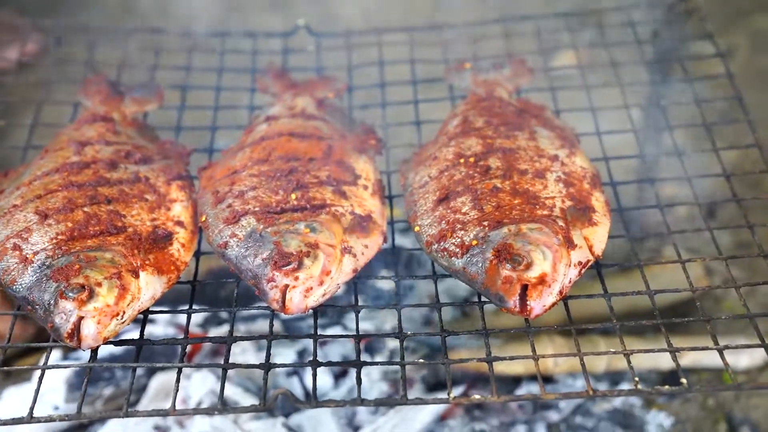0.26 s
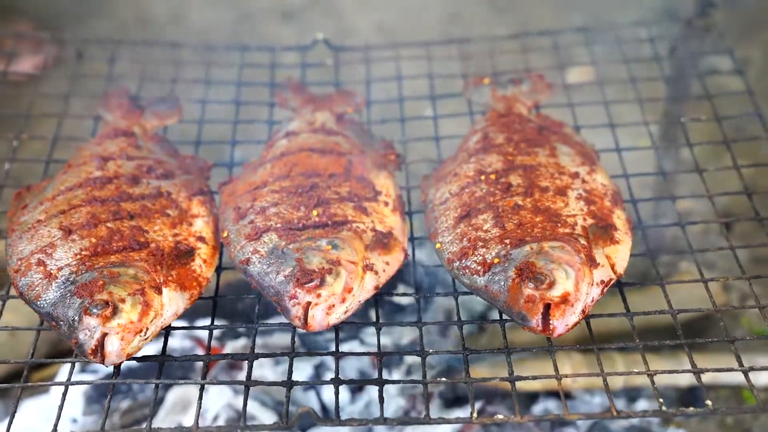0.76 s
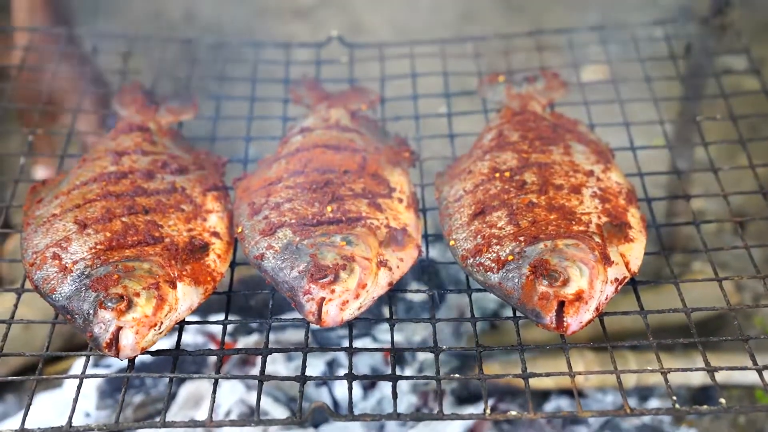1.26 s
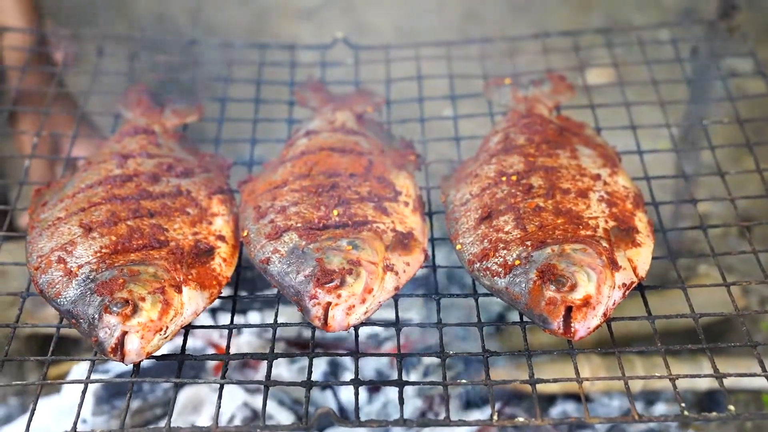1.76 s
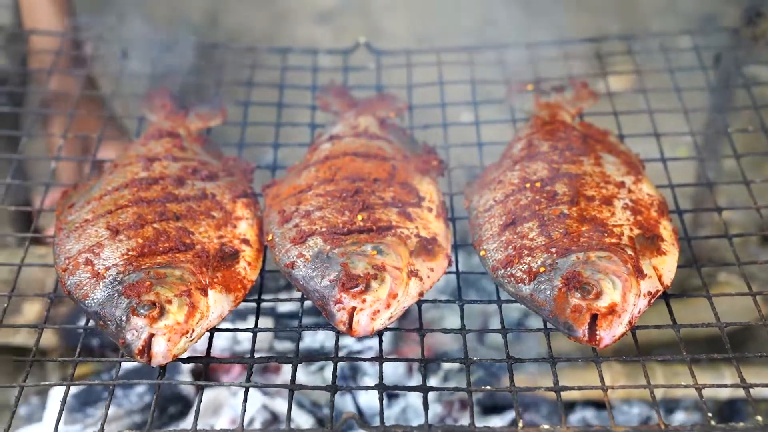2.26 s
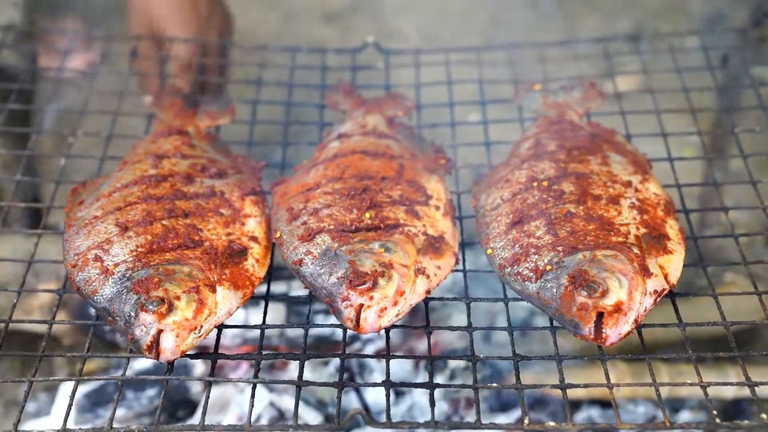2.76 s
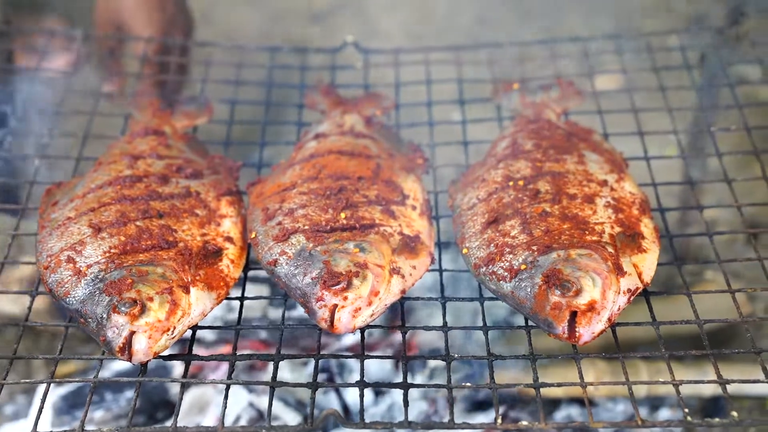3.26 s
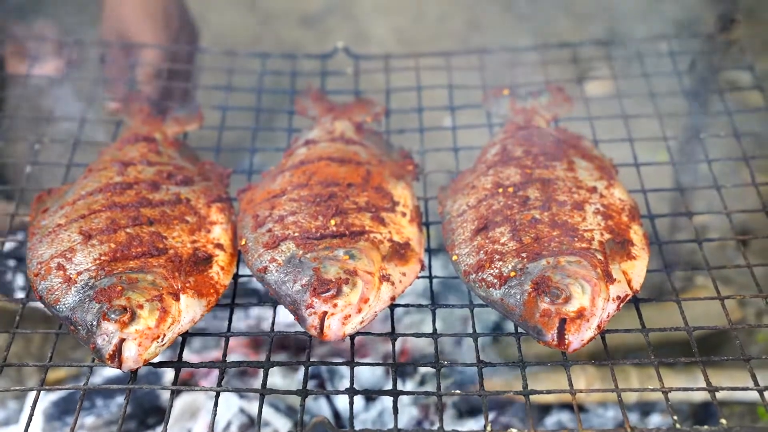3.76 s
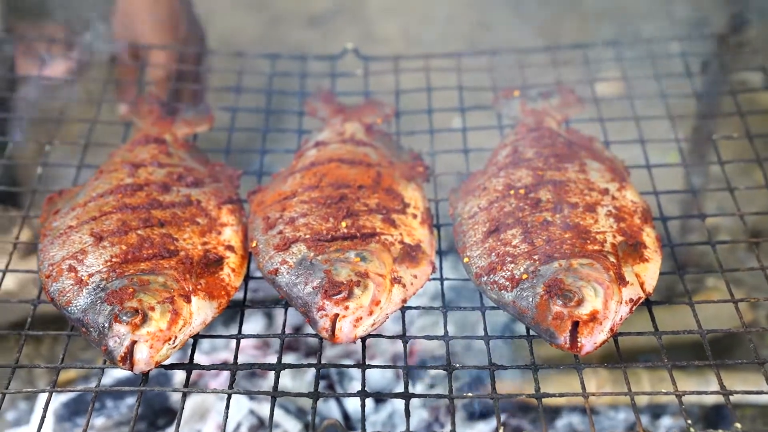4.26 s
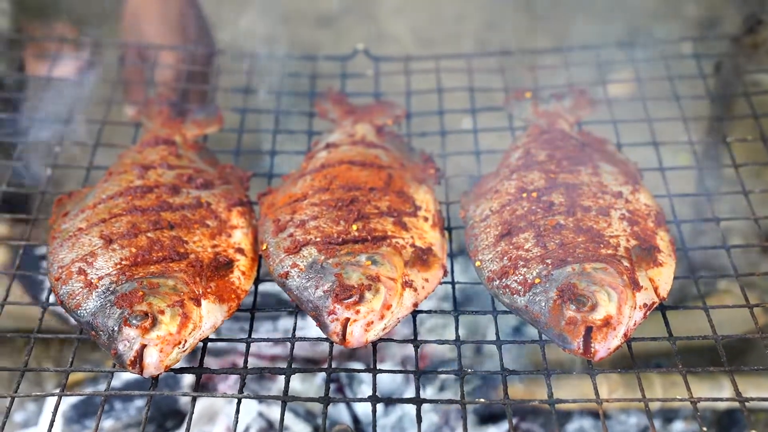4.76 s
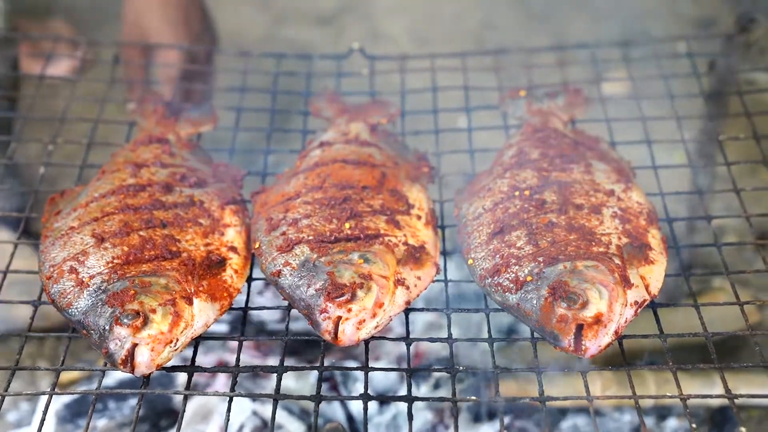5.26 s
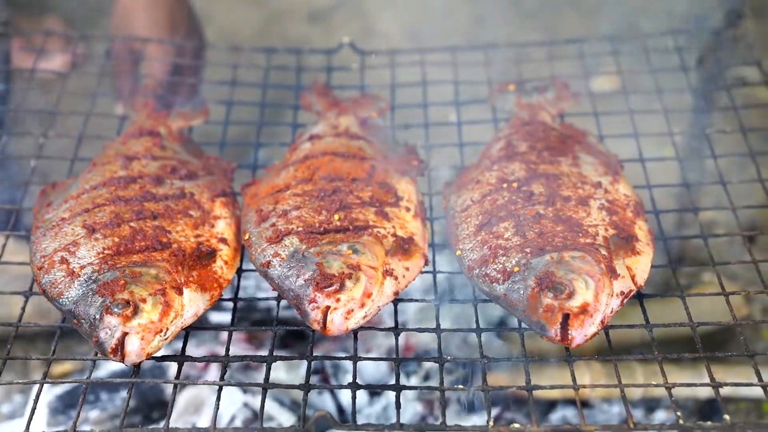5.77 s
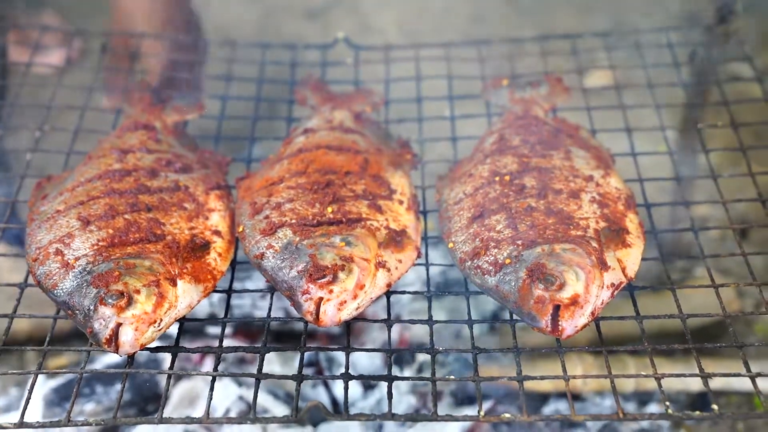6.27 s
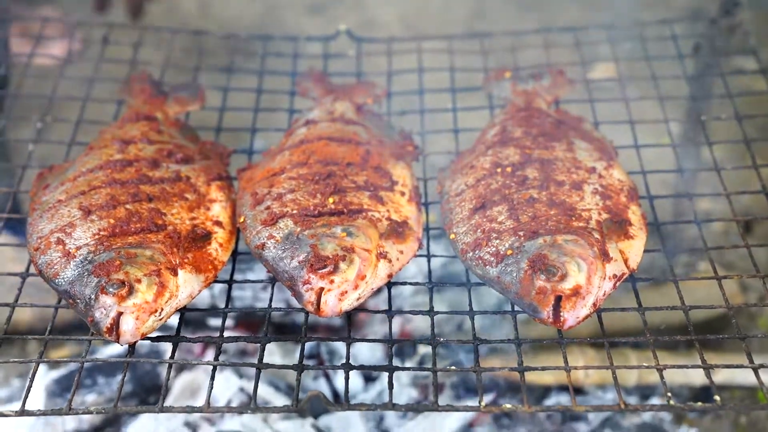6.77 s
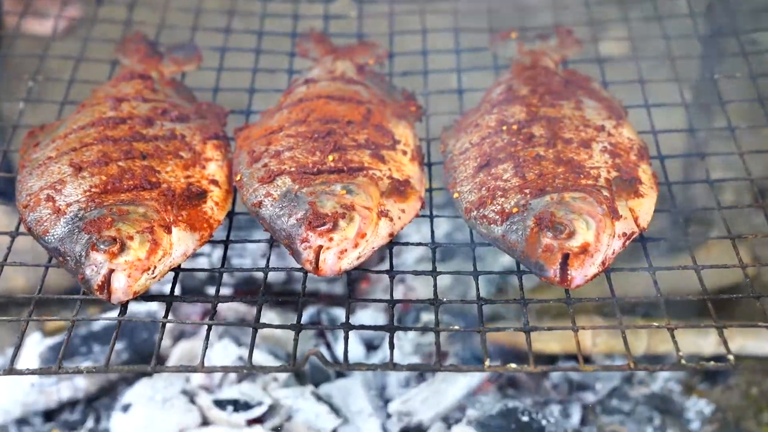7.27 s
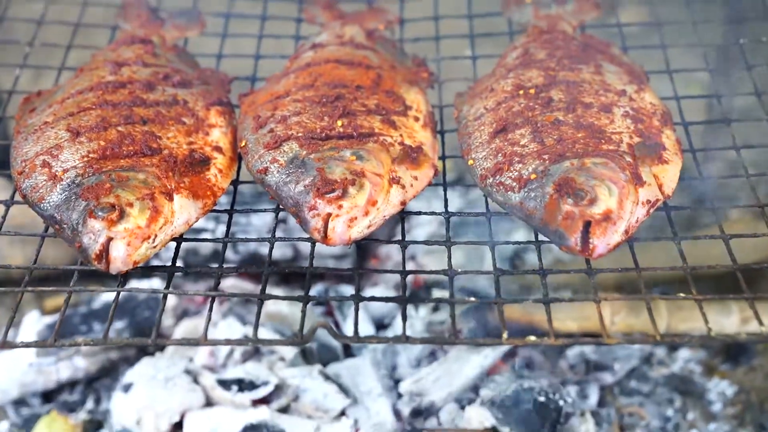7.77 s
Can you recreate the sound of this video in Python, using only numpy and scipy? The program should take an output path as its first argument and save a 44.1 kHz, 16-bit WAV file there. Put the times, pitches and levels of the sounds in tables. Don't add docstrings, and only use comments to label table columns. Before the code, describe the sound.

Sharp scattered pops from a charcoal fish grill, with gritty footsteps, a distant puttering engine, a few bird whistles and low gusty air.

```python
import sys
import numpy as np
from scipy import signal
from scipy.fft import rfft, irfft, next_fast_len
from scipy.io import wavfile
from scipy.ndimage import uniform_filter1d, map_coordinates

SR = 44100
rng = np.random.default_rng(int(sys.argv[2]) if len(sys.argv) > 2 else 0)


def boost_factor(decibels):
    exponent = np.asarray(decibels, float) / 20
    return 10 ** exponent


def materialize(psi):
    bounded = np.clip(np.atleast_2d(psi).T, -1, 1)
    quanta = np.round(bounded * 32767).astype(np.int16)
    wavfile.write(sys.argv[1], SR, quanta)


N = 353373

# f/Hz, level per Hz/dB
RUMBLE = [(25, -44), (50, 4), (80, -1), (115, -8.5), (190, -6.5), (260, -11), (400, -18.5), (700, -23.5),
          (1100, -30), (2000, -46.5), (4000, -69)]


def unit(x):
    return x / np.sqrt(np.mean(x ** 2) + 1e-20)


def curves(rows, edge=None):
    times, *columns = np.transpose(rows)
    return [np.interp(np.arange(N) / SR, times, column, edge, edge) for column in columns]


def wobble(rate):
    knots = rng.standard_normal(int(N * rate / SR) + 4)
    coarse = np.arange(0, N + 64, 64)
    smooth = map_coordinates(knots, [coarse * rate / SR])
    return np.interp(np.arange(N), coarse, smooth)


def coloured(x, spectrum):
    size = next_fast_len(N + 8192)
    hz, db = np.transpose(spectrum)
    log_hz = np.log(np.fft.rfftfreq(size, 1 / SR) + 1)
    gain = boost_factor(np.interp(log_hz, np.log(hz + 1), db, -120, -120))
    return unit(irfft(rfft(x, size) * gain, size)[:N])


def banded(x, centre_hz, octaves, top_hz=40000):
    hz = np.fft.rfftfreq(len(x), 1 / SR) + 1
    bell = np.exp(-.5 * (np.log2(hz / centre_hz) / max(octaves, .02)) ** 2)
    bass_cut = 1 + (220 / hz) ** 4
    treble_cut = 1 + (hz / top_hz) ** 3
    return irfft(rfft(x) * bell / bass_cut / treble_cut, len(x))


def band_width(octaves, narrowing, hz):
    return octaves * (hz / 1000) ** -narrowing


def add(track, s, burst):
    part = track[max(round(s * SR), 0):][:len(burst)]
    part += burst[:len(part)]


def air():
    # t/s, level/dB
    gust_points = [(0.0, -26.5), (0.56, -21), (0.6, -33), (1.27, -25.5), (1.42, -31.5), (2.94, -31),
                   (3.14, -20), (3.21, -32.5), (4.43, -29.5), (4.54, -22.5), (5.21, -37.5), (5.26, -24),
                   (5.48, -33), (6.91, -29.5), (7.35, -20), (7.51, -38), (7.75, -19), (8.0, -25.5)]
    # f/Hz, level per Hz/dB
    sway_colour = [(4, -31), (8, -9.5), (11.5, 5), (15, -6.5), (22, -18.5)]
    # f/Hz, level per Hz/dB
    buffet_colour = [(10, -11), (20, 2.5), (27, -4), (32, -12), (45, -17), (70, -25)]
    gust_db, = curves(gust_points)
    noise = rng.standard_normal((3, N))
    sway = boost_factor(gust_db - 0.4) * coloured(noise[0], sway_colour)
    buffet_db = -37 + .3 * (gust_db - gust_db.mean()) + 3 * wobble(4)
    buffeting = boost_factor(buffet_db) * coloured(noise[1], buffet_colour)
    rumble_db = -42.2 + .2 * wobble(3) + 0.72 * wobble(9)
    return sway + buffeting + boost_factor(rumble_db) * coloured(noise[2], RUMBLE)


def engine():
    # t/s, firings per second/Hz
    speed = [(0.0, 25.5), (2.94, 25.5), (4.17, 26.0), (6.73, 25.6), (8.0, 26.0)]
    # multiple of the firing rate, level/dB
    exhaust = [(3, -59), (5, -58), (6, -51.5), (7, -49), (8, -50.5), (9, -64.5), (10, -61.5), (11, -67),
               (12, -60), (23, -70.5), (26, -71), (27, -67)]
    # t/s, f/Hz, level/dB
    drone = [(0, 77.1, -55), (2.4, 79, -52.5), (3, 82, -59), (4.5, 83, -49.5), (5.3, 83, -55.5),
             (6, 71.8, -57), (8, 67.6, -55)]
    firing_hz = curves(speed)[0] * (1 + .002 * wobble(4))
    turn = 2 * np.pi * np.cumsum(firing_hz) / SR
    out = np.zeros(N)
    for multiple, db in exhaust:
        waver = boost_factor(1.6 * wobble(3)) * np.exp(.3j * wobble(4))
        out += boost_factor(db + 3.5) * np.imag(waver * np.exp(1j * round(multiple) * turn))
    drone_hz, drone_db = curves(drone)
    drone_level = boost_factor(drone_db + 6.5 + 3.3 * wobble(3.96))
    return out + drone_level * np.sin(2 * np.pi * np.cumsum(drone_hz) / SR)


def whistles(calls, flutter_db, waver, bend):
    rise, fall, edge_db = 0.18, .5, -10
    out, flutter, smear = np.zeros(N), wobble(110), wobble(250)
    for k, (s, length, start_hz, glide, db) in enumerate(calls):
        t = np.arange(round(length * SR)) / SR
        shape_db = np.interp(t / length, [0, rise, 1 - fall, 1], [edge_db, 0, 0, edge_db])
        age = np.clip(t / .12, .2, 1)
        own = slice(k * SR, k * SR + len(t))
        path_hz = start_hz + glide * length * (t / length) ** bend
        hz = path_hz * (1 + waver * age * smear[own])
        level_db = db + shape_db + 5.0 + flutter_db * age * flutter[own]
        add(out, s, boost_factor(level_db) * np.sin(2 * np.pi * np.cumsum(hz) / SR))
    return out


def bird():
    # t/s, length/s, start f/Hz, glide/(Hz/s), level/dB
    songs = [
        (.94, .25, 2870, 3300, -60),
        (3.24, .32, 3000, 1330, -60),
        (7.5, .16, 3330, 750, -66),
    ]
    # t/s, length/s, start f/Hz, glide/(Hz/s), level/dB
    fowl = [
        (6.47, .41, 850, 0, -64.5),
        (6.94, .09, 1590, -160, -64),
        (7.12, .22, 1510, -80, -67),
        (7.14, 0.47, 754, -49, -64),
        (7.76, .3, 1500, -60, -67),
    ]
    out = whistles(songs[:1], flutter_db=3.5, waver=.035, bend=1.7)
    out += whistles(songs[1:], flutter_db=2.5, waver=.014, bend=.85)
    return out + whistles(fowl, flutter_db=4, waver=.03, bend=1)


def gritty(size, grain_db, patch_db):
    jumps = np.repeat(rng.standard_normal(size // 40 + 1), 40)[:size]
    z = signal.stft(rng.standard_normal(size) * boost_factor(grain_db * jumps), nperseg=128)[2]
    patches = uniform_filter1d(rng.standard_normal(z.shape), size=3, axis=0)
    patches = uniform_filter1d(patches, size=8, axis=1)
    return unit(signal.istft(z * boost_factor(patch_db * unit(patches)), nperseg=128)[1][:size])


def feet():
    # peak t/s, level/dB, rise/s, fall/s
    drags = [
        (1.65, -46.5, .55, .55),
        (2.18, -44, 0.34, .5),
        (3.38, -51.5, .35, .13),
        (4.34, -53, .6, .35),
        (5.07, -50, 0.32, .3),
        (5.77, -48, .25, .4),
    ]
    # f/Hz, level per Hz/dB
    grit_colour = [(120, -16), (300, -4), (800, 2), (2000, 1), (4000, -0.5), (8000, -2), (12000, -12),
                   (16000, -11)]
    # t/s, level/dB, half length/s, centre f/Hz
    scuffs = [(1.241, -48.5, 0.024, 2260), (1.484, -47, .014, 1200), (1.564, -42.5, .022, 890),
              (1.611, -42, .015, 2810), (1.688, -44, 0.014, 2030), (1.818, -42.5, .026, 2800),
              (1.887, -43, .017, 2800), (1.915, -43, .011, 1560), (2.056, -38, .015, 2800),
              (2.084, -38, .011, 2000), (2.199, -35.5, .011, 3200), (2.291, -41.5, 0.019, 1920),
              (2.368, -38.5, .022, 2700), (2.41, -38.5, .02, 3400), (2.887, -49.5, .012, 1110),
              (3.221, -51, .011, 2220), (3.312, -47.5, .015, 1610), (4.141, -40.5, 0.012, 1500),
              (4.239, -47.5, .014, 1010), (4.41, -42, 0.017, 2280), (4.511, -41.5, .011, 2630),
              (4.925, -40.5, .015, 1460), (5.06, -55, .018, 1970), (5.24, -48, .024, 2120),
              (5.315, -47.5, 0.013, 910), (5.855, -39.5, .016, 1200), (5.877, -39.5, .011, 1200),
              (6.222, -44.5, .014, 890), (6.99, -57, 0.014, 1850)]
    # t/s, level/dB, centre f/Hz
    stones = [(1.338, -55, 1060), (1.368, -51, 910), (1.434, -48, 1260), (1.734, -50, 2270),
              (1.849, -43.5, 2010), (2.165, -41, 5000), (2.236, -37, 2520), (2.473, -47, 1020),
              (2.715, -52, 2100), (3.285, -50, 6900), (4.27, -53, 960), (4.471, -48, 2294),
              (4.49, -48, 3500), (4.839, -29.5, 900), (5.577, -47.5, 2550), (5.615, -48.5, 2293),
              (5.677, -51, 1640), (5.745, -43, 2270), (5.822, -41, 820), (6.185, -54, 2070),
              (6.278, -56, 2050), (6.876, -59, 563), (7.175, -54, 770)]
    # t/s, peak level/dB, f/Hz, time to fall 60 dB/s
    thuds = [
        (1.26, -36, 116, 0.055),
        (1.556, -26, 174, .044),
        (1.697, -28, 138, 0.057),
        (1.739, -25.5, 156, 0.062),
        (2.074, -25, 169, 0.071),
        (2.196, -30, 140, .065),
        (4.839, -19.5, 147, .043),
        (4.911, -18.5, 119.3, .064),
        (5.325, -24.5, 143, 0.036),
        (5.881, -17.5, 112, .075),
    ]
    t = np.arange(N) / SR
    drag = np.zeros(N)
    for s, db, rise, fall in drags:
        drag += boost_factor(db - 15.5 * np.maximum((s - t) / rise, (t - s) / fall))
    grit = coloured(gritty(size=N, grain_db=3, patch_db=3.0), grit_colour)
    out = drag * boost_factor(1.8 * wobble(30)) * grit
    out += drag * boost_factor(4.5) * coloured(rng.standard_normal(N), RUMBLE)

    stone_half_s = .008
    for s, db, half, hz in scuffs + [(s, db, stone_half_s, hz) for s, db, hz in stones]:
        reach = 2048 if half < .014 else 4096
        t = np.arange(-reach, reach) / SR
        side_s = max(half, .002) * np.where(t < 0, .9, 1)
        stroke = np.exp(-.6 * (t / side_s) ** 2)
        grit = gritty(size=len(t), grain_db=3.9, patch_db=2.9)
        crunch = unit(banded(grit, hz, band_width(2.07, 0.29, hz), top_hz=15500))
        add(out, s + t[0], boost_factor(db) * stroke * crunch)

    t = np.arange(4096) / SR
    for s, db, hz, t60 in thuds:
        attack = (1 - np.exp(-t / .0052)) ** 2
        swell = boost_factor(-60 * t / t60) * attack
        thump = np.sin(2 * np.pi * hz * (t + 0.99 * t * t))
        crunch_db = -41 + .35 * (db + 25) - db
        crunch = boost_factor(crunch_db) * unit(banded(rng.standard_normal(len(t)), centre_hz=275, octaves=0.58))
        add(out, s, boost_factor(db) * swell / swell.max() * (thump + crunch))
    return out


def crack(db, hz, octaves, t60, echo_db):
    wall_s = 0.0105
    t = np.arange(4096) / SR
    splinters = boost_factor(-16.0 - 60 * t / 0.033)
    split = rng.standard_normal(len(t)) * (boost_factor(-60 * t / max(t60, .001)) + splinters)
    split[0] = -5
    echo = rng.standard_normal(len(t)) * (t > wall_s) * boost_factor(echo_db - 60 * (t - wall_s) / 0.058)
    burst = banded(np.roll(split + echo, 128), hz, octaves)
    return boost_factor(db) * burst / np.abs(burst).max()


def coals():
    # t/s, peak level/dB, centre f/Hz, width/octaves, time to fall 60 dB/s
    pops = [(1.6972, -11, 3000, 3.2, .0088), (2.6722, -11.5, 5800, .55, 0.0021),
            (3.029, -30, 2990, .56, .017), (4.1275, -32, 1340, 0.83, .032), (4.8351, -15.5, 870, 2, 0.038),
            (5.7384, -18.5, 4650, .79, .008), (5.781, -27, 1140, .91, .012), (5.859, -27, 1850, 0.9, .013),
            (6.2177, -20, 3500, 2, .0078), (6.5506, -19, 4500, .85, 0.011),
            (7.7102, -10.5, 3700, .5, 0.0021)]
    # t/s, peak level/dB, centre f/Hz, time to fall
    # 60 dB/s
    small_pops = [(1.2746, -28, 1560, .0025), (1.4794, -31, 1500, .02), (1.5637, -22, 6400, .003),
                  (1.6838, -24, 3740, .026), (1.9119, -27, 6330, .02), (2.0798, -25, 1760, .03),
                  (2.191, -26, 2340, .038), (2.563, -23.5, 3000, 0.009), (2.6437, -28.5, 1200, .009),
                  (3.4379, -31, 3470, .0079), (3.94, -27, 7180, .011), (4.0912, -27.5, 3000, .02),
                  (4.409, -19, 2430, .0097), (4.4664, -36, 2010, .022), (4.7668, -22, 5700, .0076),
                  (4.9264, -26, 1520, .0099), (4.9778, -27.5, 5000, .015), (5.0465, -33, 1910, .027),
                  (5.3772, -23.5, 9000, .013), (5.9325, -29, 2420, .016), (6.0752, -30, 9900, .014),
                  (6.115, -32, 1060, .025), (6.276, -30, 6000, .014), (6.3355, -32, 8600, .025),
                  (6.9918, -31, 5110, .013)]
    # t/s, peak level/dB,
    # f/Hz, width/octaves, time to fall 60 dB/s
    tinks = [(1.215, -41, 2900, 0.2, 0.2), (1.235, -45, 2450, .06, .08), (6.218, -33, 900, .7, .02),
             (5.8, -36, 330, .3, .06), (2.6722, -20, 14500, .25, .002), (6.5507, -21, 7800, .12, .009),
             (3.029, -33.5, 3250, .08, .03), (3.302, -42, 4300, .08, .05),
             (3.302, -43.5, 1470, 0.085, 0.062), (3.806, -38, 7500, .04, .03),
             (4.091, -37, 4300, 0.051, .03), (4.824, -29, 2200, 1, 0.039), (4.836, -25, 460, 0.32, 0.016),
             (4.836, -28.5, 724, 0.11, 0.022), (4.834, -21.5, 4050, .08, 0.045),
             (5.376, -38.5, 4300, 0.14, .015), (2.6722, -21, 1100, 1.3, 0.0026),
             (6.5503, -23, 5000, .25, .008), (7.7105, -30, 6600, .1, 0.0052), (5.325, -34, 270, .1, 0.055),
             (3.024, -40.5, 2200, 0.17, .03), (4.13, -35, 1330, 0.14, 0.055),
             (5.739, -29.5, 4400, 0.11, .012), (1.475, -42, 2100, 0.1, 0.051)]
    lead_s = .0027
    out = np.zeros(N)
    smaller = [(s, db, hz, band_width(1.98, 0.43, hz), t60) for s, db, hz, t60 in small_pops]
    for s, db, hz, octaves, t60 in pops + smaller:
        echo_db = -22 - 6 * max(np.log2(hz / 3000), 0)
        add(out, s - lead_s, crack(db, hz, octaves, t60, echo_db))
    for s, db, hz, octaves, t60 in tinks:
        add(out, s - lead_s, crack(db, hz, octaves, t60, echo_db=-42))
    return out


def scene():
    mono = air() + engine() + bird() + feet() + coals()
    return np.array([mono, mono])


def roll_off(x):
    return signal.sosfilt(signal.butter(12, 16660, fs=SR, output="sos"), x)


def record(dry):
    # f/Hz, level per Hz/dB
    hiss_colour = [(300, -30), (700, 3.5), (2000, -2), (5000, -1.5), (10000, -0.5), (14800, 0), (16000, -2)]
    # f/Hz, level per Hz/dB
    apart_colour = [(200, -60), (340, -3.5), (500, -2), (1500, -5.5), (4000, -3), (8000, -2.2),
                    (11000, -1.5), (15800, -2)]
    top_hz = 15880
    common = boost_factor(-49) * coloured(rng.standard_normal(N), hiss_colour)
    apart = boost_factor(-59.4) * coloured(rng.standard_normal(N), apart_colour)
    size = next_fast_len(N)
    spectrum = rfft(dry + [common + apart, common - apart], size)
    spectrum = spectrum * (np.fft.rfftfreq(size, 1 / SR) < top_hz)
    return roll_off(irfft(spectrum, size)[:, :N])


dry = scene()
out = record(dry)
materialize(out)
```